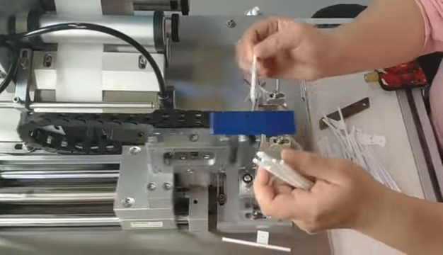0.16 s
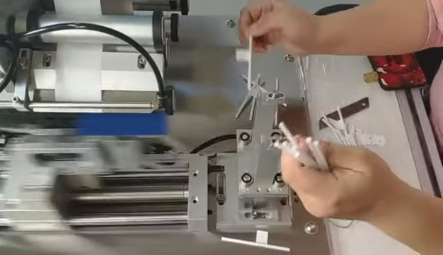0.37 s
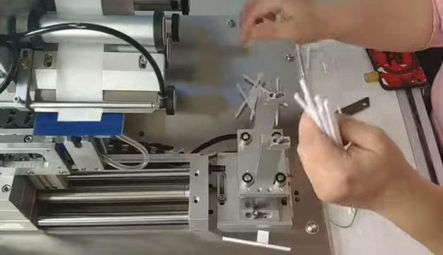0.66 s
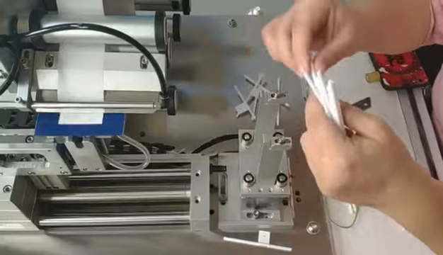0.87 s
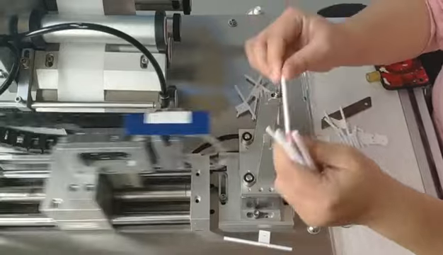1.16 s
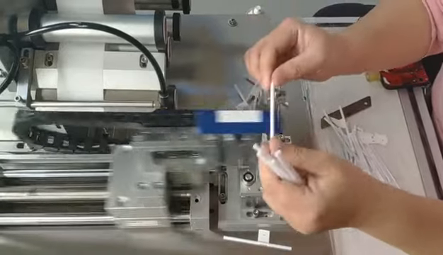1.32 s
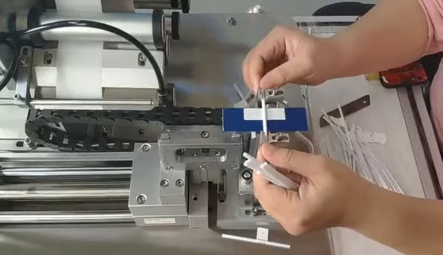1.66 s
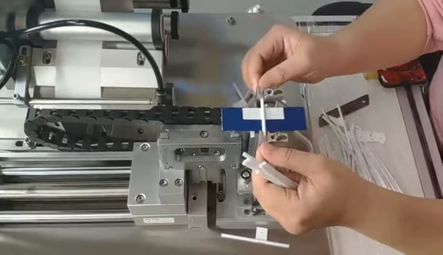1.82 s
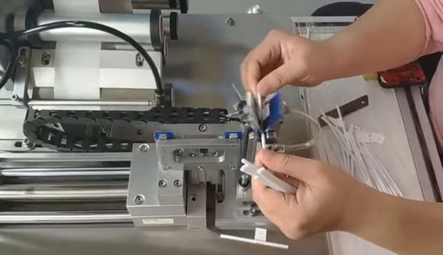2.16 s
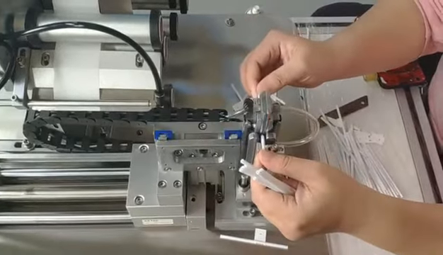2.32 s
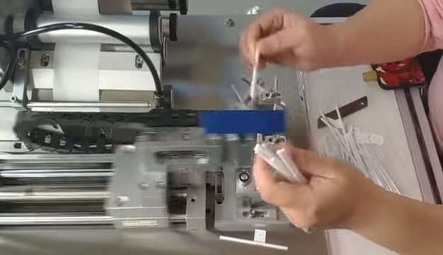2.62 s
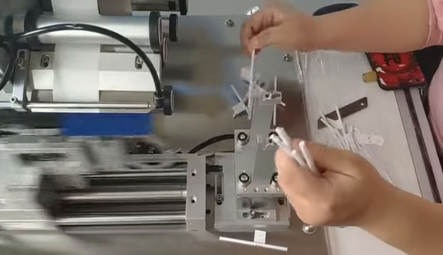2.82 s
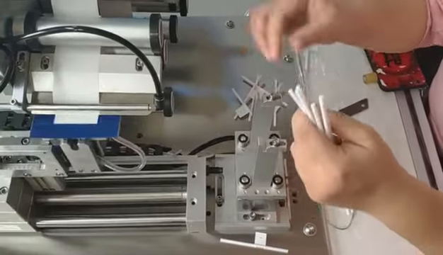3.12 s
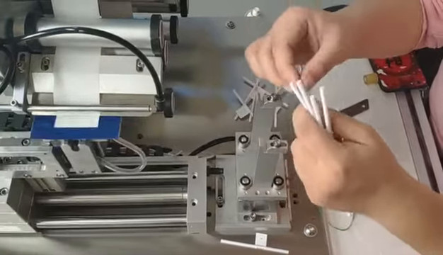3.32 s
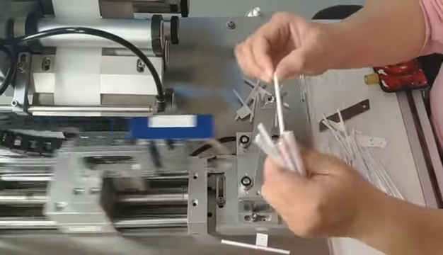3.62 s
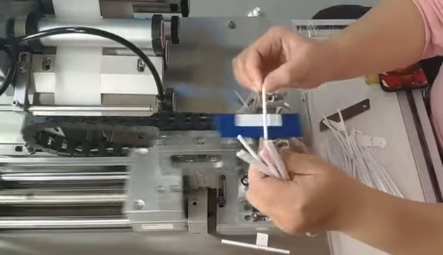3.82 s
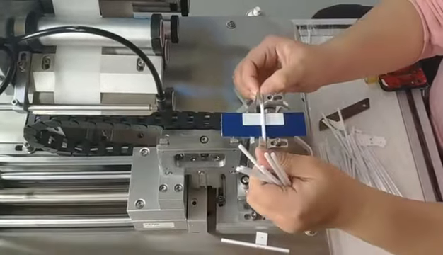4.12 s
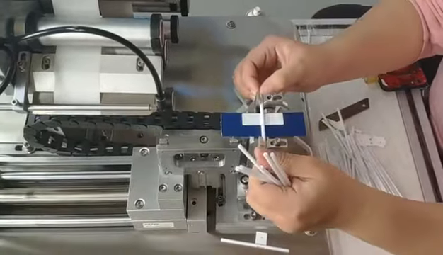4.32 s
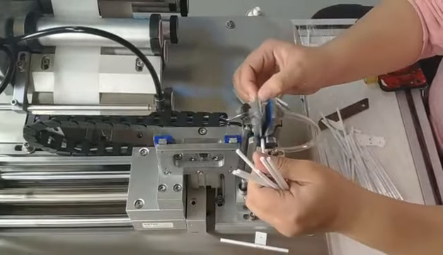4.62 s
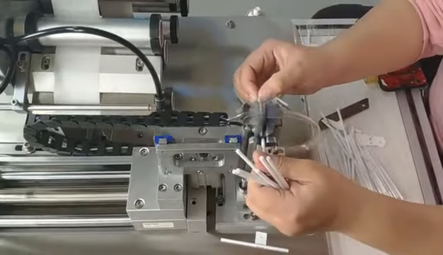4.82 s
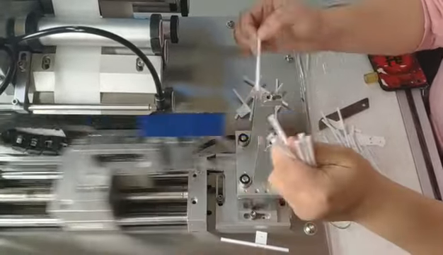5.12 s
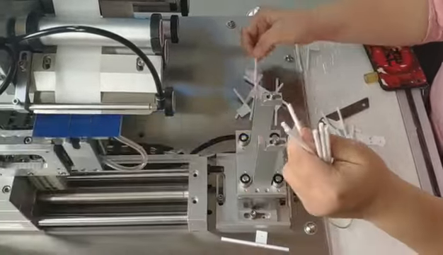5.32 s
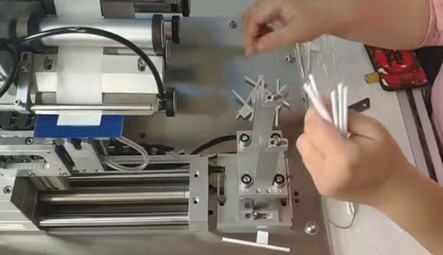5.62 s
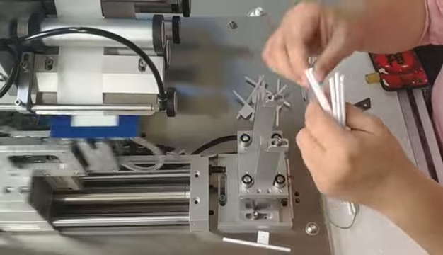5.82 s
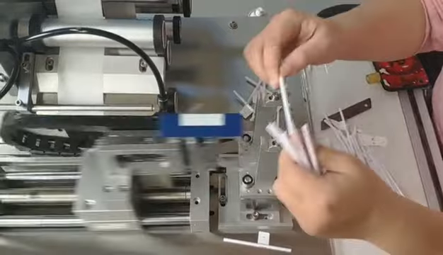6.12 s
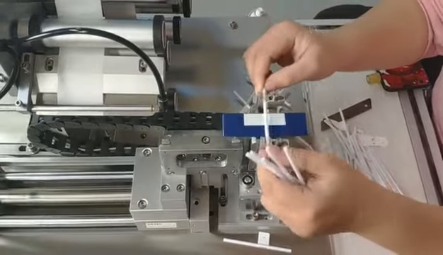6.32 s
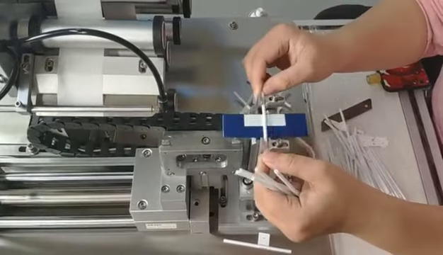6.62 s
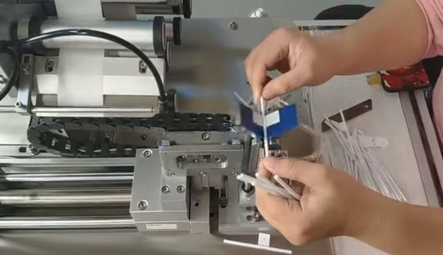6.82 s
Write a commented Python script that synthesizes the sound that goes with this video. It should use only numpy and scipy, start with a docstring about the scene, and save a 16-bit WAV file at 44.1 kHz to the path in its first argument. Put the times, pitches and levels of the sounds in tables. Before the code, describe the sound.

Close up and to the left, a vacuum jet hisses and sputters, then drops away as valves vent and a sliding carriage knocks against its stop. Faint ticks follow, a sharp puff of air brings the hiss back, and a soft bump leads to the snap of folding jaws. This labelling machine goes through roughly three such cycles, heard in stereo, with slight reverberation and a steady low workshop rumble underneath.

```python
"""A sputtering hiss comes first, on the left: the vacuum ejector of a pneumatic labelling machine,
close to a stereo pair of microphones in a workshop. Valves vent, cylinders thump, and the carriage
slides home against its stop and rings the frame. About every 2.4 s an air blast puts a label on the
pad, the ejector hisses while the carriage runs out and waits, and jaws fold the label round a tube.
Feed and fold each run on a fixed timer. The low rumble of the shop lies under it all."""
import sys
import numpy as np
from scipy import signal
from scipy.fft import rfft, irfft, next_fast_len
from scipy.io import wavfile
from scipy.ndimage import uniform_filter1d, map_coordinates

SR = 44100
rng = np.random.default_rng(int(sys.argv[2]) if len(sys.argv) > 2 else 0)


def unload_audio(sound):
    """Save the sound as a 16-bit wav file, at the path given as the first command line argument."""
    columns = np.transpose(np.atleast_2d(sound))
    # keep every value between -1 and 1, then stretch to whole-number steps
    steps = np.round(np.clip(columns, -1, 1) * 32767)
    wavfile.write(sys.argv[1], SR, steps.astype(np.int16))


N = 306936


# the ejector's jet at full and at low flow, and the rush in the hoses: frequency_hz, density_db
FULL_JET = [(3000, -45.5), (5400, -31), (5750, -9.5), (6120, -12.5), (6270, -1.3), (6650, 1), (6900, -1.5),
            (7200, 0.5), (7480, -2), (7560, -4), (7700, -7.3)]
SLACK_JET = [(3000, -33), (5000, -15.5), (5800, -3.5), (6250, -5), (6520, -0.5), (6900, -2), (7500, -8.5)]
HOSE_RUSH = [(300, -29), (900, -15), (1650, -12), (2000, -2), (2300, -3), (2520, .5), (2900, -.5),
             (3300, 1.5), (3900, 0), (4700, -4), (5600, -3.5), (7500, -12)]
# edge tones of the nozzle, and air columns in the hoses: pitch_hz, width_hz, level_db
EDGE_TONES = [(6920, 70, -6), (7115, 50, 0), (7305, 100, -5)]
HOSE_MODES = [(1990, 120, -11), (2515, 90, -.5), (2715, 70, -3), (3100, 110, -.5), (3385, 90, .5),
              (3820, 60, -6)]

def ejector():
    """The vacuum ejector, close on the left: a sputtering jet over a hollow rush in the hoses."""
    jet_db, hose_db = air_flow()
    flow = np.clip((jet_db + 35.5) / 9, 0, 1)  # at full flow the jet is higher and whistles
    whistle = from_left(resonant(EDGE_TONES, drift=.002), lead_ms=.13)
    full = coder_holes(noise(FULL_JET), depth_db=2.5) + amp(-7.5 + 2 * wobble(7)) * whistle
    jet = np.sqrt(flow) * full + np.sqrt(1 - flow) * noise(SLACK_JET)
    rush = plates(noise(HOSE_RUSH), t60=.06, share=.42)
    hollow = from_left(resonant(HOSE_MODES, drift=.003), lead_ms=.13)
    hoses = coder_holes(rush + amp(-6) * hollow, depth_db=5.2)
    sputter_db = .6 * wobble(30) + .8 * wobble(140)
    return amp(sputter_db) * (amp(jet_db + 1) * jet * pan(side_db=13) + amp(hose_db) * hoses)


# machine cycles, the first already under way: feed_start_s, fold_start_s, jet_offset_db, leak_offset_db
CYCLES = [(-1.44, -0.259, -1.5, -8), (0.975, 2.157, -0.2, 1.5), (3.388, 4.558, 0.6, 1.5),
          (5.793, 6.820, 1.1, 0)]

def air_flow():
    """Jet and hose levels in dB: vacuum, folding cylinder, exhaust and a faint leak add in power."""
    feed, _, strength, leak = np.transpose(CYCLES)
    cycle = np.searchsorted(feed, clock()) - 1
    strength_db, leak_db = strength[cycle], leak[cycle]
    surge = np.exp(-since("blown") / .4)  # the vacuum surges as it starts, then settles
    exhaust_s = since("exhaust")  # the exhaust sags as the cylinder's pressure drops
    sucking = gate(when("run out"), when("vacuum off"), rise=.06, fall=.032)
    folding = gate(when("fold"), when("open"), rise=.01, fall=.03)
    homing = gate(when("exhaust"), when("home"), rise=.015, fall=.05)
    jet = [amp(-28.9 + strength_db + 9.8 * surge) * sucking,
           amp(-33.5 + strength_db) * folding,
           amp(-34 + strength_db - 12 * exhaust_s) * homing,
           amp(-48 + leak_db)]
    hoses = [amp(-35.2 + 2.7 * surge) * gate(when("blown"), when("vacuum off"), rise=.035, fall=.07),
             amp(-40) * folding,
             amp(-38 - 15 * exhaust_s) * gate(when("exhaust"), when("home"), rise=.025, fall=.04),
             amp(-52 + leak_db)]
    return [20 * np.log10(np.linalg.norm(parts, axis=0)) for parts in (jet, hoses)]


# the blast at close range, and its wind on a microphone port: frequency_hz, density_db
BLAST_AIR = [(200, -24), (650, -20), (1400, -11.5), (1850, -16), (2350, -10.5), (2550, -.5), (2800, -5.5),
             (3200, -2), (4300, -11.5), (5200, -7), (5900, -2), (6700, -3), (7300, -1.5)]
DRAUGHT = [(40, -2.5), (120, 3.5), (250, -13), (600, -20.5), (2000, -36)]
# where the blast sits between the microphones: frequency_hz, left_minus_right_db
BLAST_SIDE = [(200, -18), (700, -5.5), (1400, -6), (1850, 1), (2600, -10), (3300, -11), (4300, -3),
              (5900, -7), (7200, 2)]

def blast():
    """A nozzle blows the label onto the pad; its draught hits the right microphone as it shuts."""
    air = noise(BLAST_AIR) + amp(-5) * from_left(noise(BLAST_AIR)[0], lead_ms=.17)
    air = filtered(air, lambda hz: pan(along(BLAST_SIDE, hz)))
    blowing = gate(when("blow"), when("blown"), rise=.009, fall=.015)
    air = plates(air, t60=.065, share=.35) * blowing * amp(-12.8 + .4 * wobble(60))
    gust = bursts(each_cycle([("blown", 0, -23)]), rise=.0087, t60=.11)
    return air + gust * noise(DRAUGHT) * pan(side_db=-20)


# air vented as a valve shifts: step, delay_s, muffler_db, hose_db
VENTS = [("fold", .003, -33, -26), ("open", .002, -25.5, -21.5), ("exhaust", .02, -26, -34),
         ("return", 0, -12, -21)]

def vents():
    """Each valve dumps a cylinder's air through its muffler, on the left, and the hoses puff."""
    rows = each_cycle(VENTS)
    jet = bursts([(s, db) for s, db, _ in rows], rise=.0025, t60=.15) * noise(FULL_JET)
    puff = bursts([(s, db) for s, _, db in rows], rise=.0083, t60=.12) * noise(HOSE_RUSH)
    return jet * pan(side_db=11) + puff


# cylinder strokes and landings: step, delay_s, thud_db, frame_db, brightness_hz
JOLTS = [("blow", .006, -35, -32, 1700), ("fold", -.002, -25, -28.5, 1200), ("shut", .002, -34, -34, 600),
         ("open", 0, -23, -27, 1200), ("return", -.016, -38, -23, 900), ("return", .001, -16, -28, 700),
         ("return", .047, -29, -28, 450), ("home", .014, -25, -16.5, 370), ("home", .036, -34, -25, 370)]
# the frame's modes: pitch_hz, level_db, t60_s
FRAME_MODES = [(112, -8.5, .26), (150, -2.5, .17), (177, -8, .12), (209.5, -3.5, .21), (232.5, -4.5, .24),
               (285.8, -1, .15), (319.5, -3.5, .085), (376, -3, .1), (451, -4.5, .18), (525, -8, .09),
               (690, -11, .04)]
# the frame's unpitched knock: frequency_hz, density_db
FRAME_KNOCK = [(150, -1.5), (450, -2), (800, -2), (1400, -2), (2500, -21.5), (6000, -24)]

def jolts():
    """Every stroke shoves the bench, knocks and rings the frame; cushioned contacts are duller."""
    t, out = np.arange(SR // 2) / SR, np.zeros((2, N))
    bench_hz, swell_s, knock_t60 = 100, .0065, .05
    thud = np.sin(2 * np.pi * bench_hz * t) * (t / swell_s * np.exp(1 - t / swell_s)) ** 2
    knock_noise = noise(FRAME_KNOCK)
    for s, thud_db, frame_db, bright_hz in each_cycle(JOLTS):
        offset = rng.integers(N - len(t))
        knock = knock_noise[:, offset:offset + len(t)] * amp(-4.5 - 60 * t / knock_t60)
        struck = ring(FRAME_MODES, spread_db=2, scatter_rad=.9) + knock
        frame = signal.lfilter(*signal.butter(1, bright_hz, fs=SR), struck)
        add(out, s - .5 / bench_hz, amp(thud_db) * thud)
        add(out, s, amp(frame_db) * frame)
    return out


# the carriage on its stop ("home") and a valve's clack ("blow"): step, delay_s, level_db
STOP_AND_VALVE_HITS = [("home", -.002, -27), ("home", .002, -20), ("home", .006, -21), ("home", .013, -30),
                       ("home", .023, -29.5), ("blow", .012, -31)]
# the stop's modes, which also voice the valve: pitch_hz, level_db, t60_s
STOP_MODES = [(400, -7, .04), (786, -3.5, .03), (925, -3.5, .05), (1300, -4, .05), (1500, -9, .035),
              (1960, -4, .04), (2240, -2.5, .03), (2400, -.5, .035), (2640, -2, .035), (2980, 2, .035),
              (3320, 0, .03), (4020, -6, .028), (4900, -6.5, .035)]

def stop_and_valve():
    """The carriage meets its stop and bounces; a valve clacks as the blast starts."""
    hits = each_cycle(STOP_AND_VALVE_HITS)
    return clacks(hits, STOP_MODES, crack_db=-11, crack_t60=.07, scrape_db=-12, scrape_s=.013)


# the jaws' contacts: start_s, level_db
JAW_HITS = [(2.3245, -17), (2.330, -25), (2.338, -30), (4.711, -29), (4.7245, -17), (4.728, -23),
            (4.778, -31), (4.865, -33)]
# the jaws' modes: pitch_hz, level_db, t60_s
JAW_MODES = [(330, -2, .035), (525, -4, .06), (770, -6, .025), (865, -1, .05), (921, -3.5, .11),
             (1380, -5, .035), (1513, 1, .05), (1750, -7, .03), (2130, 5, .03), (2260, 4, .03),
             (2450, 1, .035), (3400, -4, .015), (3950, -2, .018), (5800, 0, .035), (6100, 0, .03),
             (6320, -1, .03)]
# their linkage's rattle: frequency_hz, density_db
LINKAGE = [(300, -14), (620, -14), (760, -2), (940, 0), (1080, -22), (1480, -7), (2300, -13), (3000, -30)]

def jaws():
    """Near the microphones the jaws touch, snap shut and chatter; their linkage rattles each time."""
    snaps = clacks(JAW_HITS, JAW_MODES, crack_db=-2, crack_t60=.033, scrape_db=-13, scrape_s=.006)
    rattle = bursts(JAW_HITS, rise=.002, t60=.17) * amp(-20.5 + 4 * wobble(200)) * noise(LINKAGE)
    return snaps * pan(side_db=-1) + rattle


# the noise of a metal contact, close up: frequency_hz, density_db
CONTACT = [(200, -22), (900, -7.5), (1700, -11), (2600, -2), (4500, -14), (6200, -5), (7500, -7)]

def clacks(hits, modes, crack_db, crack_t60, scrape_db, scrape_s):
    """Metal meets metal: a short rising scrape, a crack, then the part's modes."""
    t, ringing = clock(), np.zeros((2, N))
    for s, db in hits:
        add(ringing, s, amp(db + 1.5) * ring(modes, spread_db=2, scatter_rad=1.88))
    scrape = sum(amp(db + scrape_db) * np.exp(-abs(t - s) / scrape_s) * (t < s) for s, db in hits)
    crack = amp(crack_db) * bursts(hits, rise=.0008, t60=crack_t60)
    return ringing + (scrape + crack) * noise(CONTACT)


# loose parts shaking: frequency_hz, density_db
LOOSE_PARTS = [(70, -20), (140, -1), (230, 0), (300, 0), (450, -4), (560, -18), (1000, -18), (2000, -34)]

def shudder():
    """Loose parts shudder after the carriage lands."""
    rough = amp(3.5 * wobble(90))
    return bursts(each_cycle([("home", .01, -27)]), rise=.005, t60=.35) * rough * noise(LOOSE_PARTS)


# landings at the end of the run out: start_s, level_db
ARRIVALS = [(1.617, -29), (4.04, -29.5), (6.43, -31)]
# the buffer's bump: frequency_hz, density_db
BUMP = [(70, -18), (120, 0), (160, -1), (220, -9), (300, -9), (450, -17), (800, -22), (1500, -28),
        (4000, -50)]

def buffer_bumps():
    """The buffer cushions the carriage: a soft, low bump that rumbles away."""
    return bursts(ARRIVALS, rise=.012, t60=.4) * noise(BUMP)


# ticks at the label feed: start_s, level_db
FEED_TICKS = [(.740, -26), (.8315, -27), (.973, -28), (3.129, -26), (3.387, -29), (5.657, -25),
              (5.794, -26)]
# their thin, sharp sound: frequency_hz, density_db
TICK_SPECTRUM = [(500, -18), (2000, -7), (4500, -7), (6800, -1), (8000, 0), (8400, -8), (8700, -32)]

def ticks():
    """The label feed ticks lightly, left of centre."""
    return bursts(FEED_TICKS, rise=.0002, t60=.016) * noise(TICK_SPECTRUM) * pan(side_db=4.5)


# rolling on the rails: frequency_hz, density_db
RAIL_RUMBLE = [(80, -5), (170, -3.5), (450, -3), (800, -14.5), (1600, -14.5), (4000, -15.5)]
# the cable chain's resonances: pitch_hz, width_hz, level_db
CHAIN_MODES = [(310, 70, -8), (365, 45, 0), (415, 70, -4), (530, 80, -13), (655, 60, -13)]

def rails():
    """Carriage and folding head rumble along their guides; the dragged cable chain groans upward."""
    uneven = amp(2.2 * wobble(45))
    run_home = amp(-42 - 22 * since("return")) * gate(when("return"), when("home"), rise=.027, fall=.03)
    run_out = amp(-49) * gate(when("run out"), when("run out") + .2, rise=.03, fall=.08)
    head_slide = amp(-47) * gate(when("shut"), when("open"), rise=.03, fall=.03)
    rolling = (run_home + run_out + head_slide) * noise(RAIL_RUMBLE)
    delay_s, groan_s = .025, .07
    pull = when("return") + delay_s
    groan = amp(-37) * gate(pull, pull + groan_s, rise=.008, fall=.032)
    bend = .03 * np.clip((since("return") - delay_s) / groan_s - .5, -1, 1)
    return uneven * (rolling + groan * resonant(CHAIN_MODES, drift=.01, bend=bend))


def plates(x, t60, share):
    """Quick reflections between metal plates ripple the spectrum, differently at each microphone."""
    t = np.arange(SR // 20) / SR
    echo = rng.standard_normal((2, len(t))) * amp(-60 * t / t60) * (t > .004)
    echo *= share / np.linalg.norm(echo, axis=1, keepdims=True)
    echo[:, 0] = 1  # the direct sound
    return unit(signal.fftconvolve(x, echo, axes=1)[:, :N])


# the workshop's reverberation: frequency_hz, t60_s
ROOM_DECAY = [(150, 1), (1000, 0.99), (3000, 0.36), (8000, 0.58)]

def room(x):
    """The walls answer from farther off, dying sooner in the treble."""
    hz, t, spectra = signal.stft(rng.standard_normal((2, SR // 2)), SR, nperseg=256)
    decay = amp(-60 * t / along(ROOM_DECAY, hz)[:, None])
    mid, side = signal.istft(spectra * decay * mid_side(hz[:, None]), SR, nperseg=256)[1]
    tail = np.array([mid + side, mid - side])
    return signal.fftconvolve(x, tail / np.linalg.norm(tail[0]), axes=1)[:, :N]


# the shop's room tone: frequency_hz, density_db
ROOM_TONE = [(20, -1.5), (35, 1.5), (60, -1.5), (90, -8), (113, -3.5), (150, -6), (280, -9), (400, -15.5),
             (700, -18), (1400, -24), (3000, -29), (7500, -30)]

def workshop():
    """The low rumble of the shop, all round the microphones, wavering a little."""
    return amp(-38.8 + 1.9 * wobble(8)) * noise(ROOM_TONE)


# the timers of the feed and fold sequences: step -> delay_s
FEED_TIMER = {"blow": 0, "blown": .105, "run out": .125}
FOLD_TIMER = {"fold": 0, "shut": .167, "open": .447, "vacuum off": .462, "exhaust": .515, "return": .558,
              "home": .914}

def when(step):
    """The time of a step in every cycle."""
    feed, fold, *_ = np.transpose(CYCLES)
    return feed + FEED_TIMER[step] if step in FEED_TIMER else fold + FOLD_TIMER[step]


def since(step):
    """Seconds since the step last came round."""
    t, starts = clock(), when(step)
    return abs(t - starts[np.maximum(np.searchsorted(starts, t) - 1, 0)])


def each_cycle(rows):
    """Rows of (step, delay_s, ..) played in every cycle, as (start_s, ..)."""
    return [(s, *rest) for step, delay, *rest in rows for s in when(step) + delay if 0 <= s < N / SR]


# how alike the two microphones sound: frequency_hz, correlation
MIC_LIKENESS = [(120, .997), (250, .98), (500, 0.87), (1000, .25), (2000, -0.41), (4000, -0.0051),
                (7000, -0.076)]

def mic_angle(hz):
    """The phase angle between the microphones: small in the bass, wide in the treble."""
    return np.arccos(np.clip(along(MIC_LIKENESS, hz), -1, 1))


def mid_side(hz):
    """Mid and side gains that give the microphones their likeness."""
    turn = mic_angle(hz) / 2
    return np.array([np.cos(turn), np.sin(turn)])


def pan(side_db):
    """Left and right gains for a level difference, at constant power."""
    gains = amp(np.array([side_db, -side_db]).reshape(2, -1) / 2)
    return gains / np.sqrt(np.mean(gains ** 2, axis=0))


def from_left(x, lead_ms):
    """One sound at both microphones, reaching the left one first."""
    return filtered(x, lambda hz: np.exp(1j * np.pi * hz * lead_ms / 1000 * np.array([[1], [-1]])))


def noise(spectrum):
    """Stereo noise of rms 1: alike in the bass, unrelated in the treble."""
    mid, side = filtered(rng.standard_normal((2, N)), lambda hz: amp(along(spectrum, hz)) * mid_side(hz))
    return unit(np.array([mid + side, mid - side]))


def resonant(modes, drift, bend=0):
    """Noise of rms 1 in narrow resonances, whose pitch wanders and bends by a share of itself."""
    peaks = lambda hz: sum(amp(db) / (1 + (2 * (hz - pitch) / width) ** 2) for pitch, width, db in modes)
    position = np.cumsum(1 + bend + drift * wobble(10))
    return unit(map_coordinates(filtered(rng.standard_normal(N), peaks), [position], mode="mirror"))


def ring(modes, spread_db, scatter_rad):
    """One blow on a set of modes; the higher ones reach the two microphones out of step."""
    t = np.arange(SR // 2) / SR
    out = np.zeros((2, len(t)))
    for hz, db, t60 in modes:
        apart = mic_angle(hz) * rng.normal(0, .8, (2, 1))
        phase = scatter_rad * rng.standard_normal() + apart
        pitch = hz * rng.normal(1, .01)
        decay = amp(db + spread_db * rng.standard_normal() - 60 * t / t60)
        out += decay * np.sin(2 * np.pi * pitch * t + phase)
    attack = 1 - np.exp(-t / .00017)
    return out * attack / np.linalg.norm(amp([db for _, db, _ in modes]))


def coder_holes(x, depth_db):
    """Brief narrow holes in the hiss, like those an audio coder or noise suppressor leaves."""
    spectra = signal.stft(x, nperseg=1024)[2]
    field = uniform_filter1d(rng.standard_normal(spectra.shape[1:]), size=4, axis=0)
    field = uniform_filter1d(field, size=9, axis=1)
    dips = np.minimum(unit(field), .8)
    return unit(signal.istft(spectra * amp(depth_db * dips), nperseg=1024)[1][:, :N])


def bursts(rows, rise, t60):
    """An envelope that swells and dies away at each (start_s, level_db)."""
    t, out = np.arange(SR // 2) / SR, np.zeros(N)
    for s, db in rows:
        add(out, s, amp(db - 60 * t / t60) * (1 - np.exp(-t / rise)))
    return out


def gate(starts, ends, rise, fall):
    """An envelope that rises at each start, holds, and falls after each end."""
    t = clock()
    return sum((1 - np.exp(-np.maximum(t - start, 0) / rise)) * np.exp(-np.maximum(t - end, 0) / fall)
               for start, end in zip(starts, ends))


def wobble(rate):
    """A smooth random curve, rate knots a second."""
    return map_coordinates(rng.standard_normal(int(N * rate / SR) + 4), [clock() * rate])


def filtered(x, response):
    """x shaped by a response of frequency."""
    size = next_fast_len(N + SR // 4)
    return irfft(rfft(x, size) * response(np.fft.rfftfreq(size, 1 / SR)), size)[..., :N]


def low_pass(x, edge_hz, width_hz):
    """Everything above the edge is cut, over a short slope."""
    return filtered(x, lambda hz: np.clip((edge_hz - hz) / width_hz + .5, 0, 1) ** 2)


def along(points, hz):
    """A curve through (frequency_hz, value) points on a log axis."""
    frequencies, values = np.transpose(points)
    return np.interp(np.log(hz + 1), np.log(frequencies), values)


def add(track, s, sound):
    """Mix a sound into the track at time s."""
    part = track[..., round(s * SR):][..., :sound.shape[-1]]
    part += sound[..., :part.shape[-1]]


def amp(db):
    """Decibels to gain."""
    return 10 ** (np.asarray(db) / 20)


def unit(x):
    """Scaled to rms 1."""
    return x / np.sqrt(np.mean(x ** 2) + 1e-20)


def clock():
    """The time of every sample."""
    return np.arange(N) / SR


def scene():
    """At the bench, jaws and air bursts are drier than the knocks; only ticks reach above the hiss."""
    contacts, snaps = stop_and_valve(), jaws()
    knocks = contacts + jolts() + shudder() + buffer_bumps()
    near = blast() + vents() + snaps
    walls = room(amp(-8) * knocks + amp(-14) * near)
    machine = knocks + near + walls + ejector() + rails()
    return low_pass(machine + workshop(), edge_hz=7590, width_hz=240) + ticks()


def record(dry):
    """Both microphone channels lose their top treble."""
    return low_pass(dry, edge_hz=8500, width_hz=500)


dry = scene()
out = record(dry)
unload_audio(out)
```